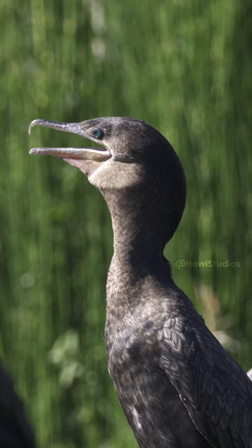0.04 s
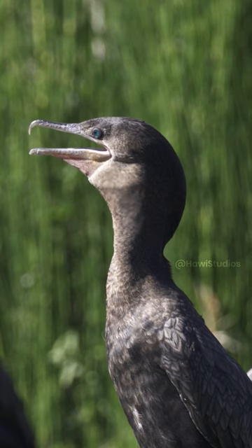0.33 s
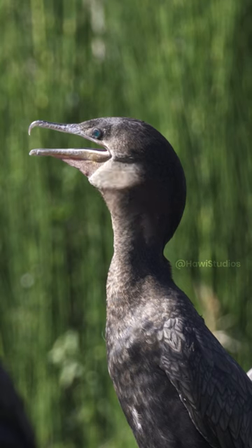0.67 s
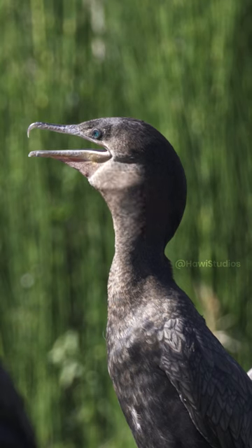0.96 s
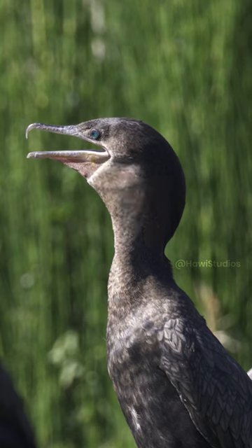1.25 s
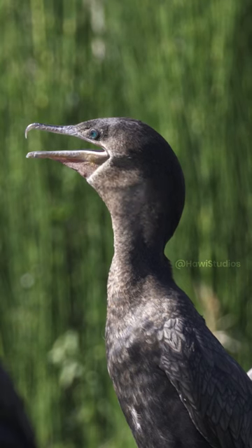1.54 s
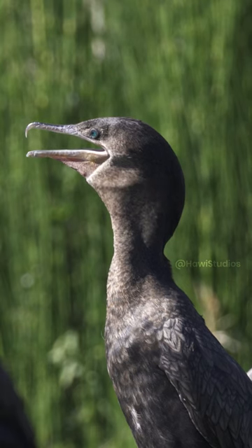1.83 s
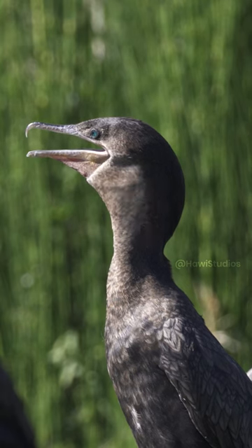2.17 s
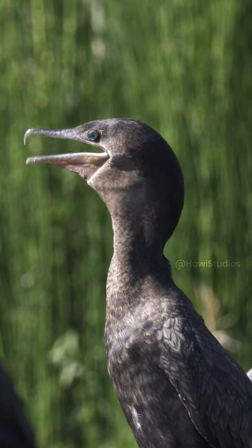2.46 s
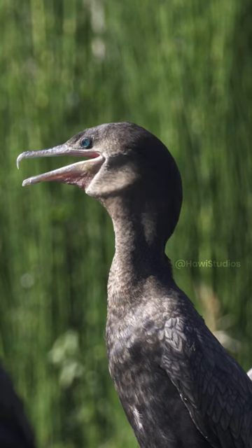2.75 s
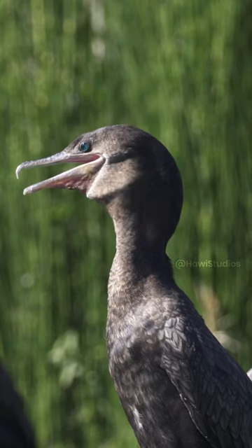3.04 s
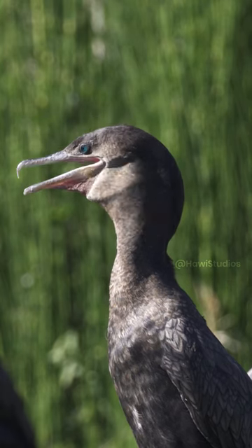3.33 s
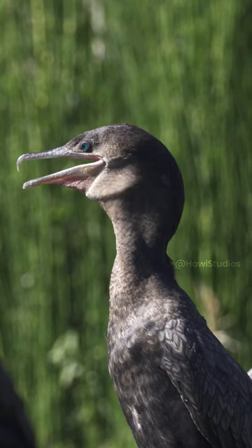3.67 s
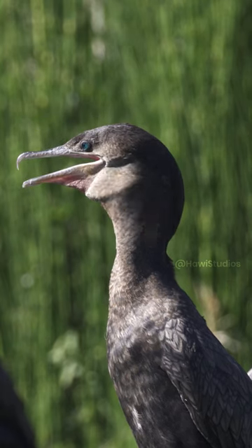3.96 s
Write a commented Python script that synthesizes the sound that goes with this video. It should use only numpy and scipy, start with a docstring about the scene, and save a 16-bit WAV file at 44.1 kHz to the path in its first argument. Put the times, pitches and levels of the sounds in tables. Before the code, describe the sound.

A cormorant rasps harshly close by on the left in rapid double strokes, which turn quicker and brighter, then uneven. Faint distant birds whistle and mew over a high twittering hiss and a low outdoor rumble.

```python
"""A cormorant rasps close by on the left, bill open: double rasps, ten a second, each led by a soft
scrape; then quicker, brighter doubles as the bill opens wider, and a limping run of single rasps.
Each rasp is a burst of tiny snaps and air that rings the throat. Behind it, far birds give falling
whistles and hoarse mews, and there is one soft, dull bump. The bed is a high, uneven, twittering
hiss over a low outdoor rumble."""
import sys
import numpy as np
from scipy import signal
from scipy.fft import rfft, irfft
from scipy.io import wavfile
from scipy.ndimage import uniform_filter1d

SR = 44100
rng = np.random.default_rng(int(sys.argv[2]) if len(sys.argv) > 2 else 0)


def int16_out(signal):
    """Quantize to a 16-bit WAV file."""
    q = np.round(np.clip(np.atleast_2d(signal).T, -1, 1) * 32767)
    wavfile.write(sys.argv[1], SR, q.astype(np.int16))


N = 176400

# Cue levels are ahead of the mix gains.
# double rasps: first stroke (t/s, level/dB, length/s), then the same for the second
DOUBLE_CUES = [(0.1514, -28, 0.0055, 0.1678, -29, 0.0065), (0.2545, -25, 0.0041, 0.268, -30, 0.0052),
               (0.3546, -34.5, 0.0085, 0.3696, -30, 0.0098), (0.4573, -31, 0.0053, 0.4721, -29, 0.0063),
               (0.5595, -27.3, 0.0036, 0.5758, -29.5, 0.0056), (0.6628, -31, 0.0047, 0.6784, -29, 0.0049),
               (0.7642, -30.5, 0.0035, 0.7767, -28, 0.0079), (0.8658, -27, 0.0024, 0.8838, -27.6, 0.0054),
               (0.9719, -29.5, 0.0052, 0.9864, -31, 0.0067), (1.0733, -31, 0.0044, 1.0884, -26.6, 0.006),
               (1.176, -31.5, 0.0054, 1.1926, -29.5, 0.0052), (1.282, -36, 0.011, 1.2955, -29, 0.0095),
               (1.386, -29, 0.0047, 1.4045, -31, 0.0093), (1.4941, -31.5, 0.0057, 1.5075, -26, 0.0067),
               (1.6081, -29.2, 0.0057, 1.6242, -29.0, 0.0044), (1.7099, -31.0, 0.0063, 1.7262, -31, 0.0082),
               (1.81, -31.5, 0.0057, 1.8249, -28, 0.0067), (1.9106, -29, 0.0071, 1.9277, -26.5, 0.0059),
               (2.0146, -29.5, 0.0078, 2.0301, -31, 0.0076), (2.1163, -27.5, 0.0047, 2.1311, -28, 0.0064),
               (2.2179, -29.5, 0.0057, 2.2337, -26.5, 0.0054), (2.3228, -30.5, 0.0052, 2.3368, -27, 0.0056),
               (2.4225, -33.5, 0.006, 2.4382, -26.5, 0.0063), (2.5255, -29, 0.0039, 2.5416, -24, 0.0064),
               (2.6308, -32, 0.0064, 2.6457, -28.5, 0.0081), (2.7452, -27, 0.0031, 2.7568, -35, 0.0055),
               (2.8163, -28.5, 0.0034, 2.828, -37.5, 0.0086),
               (2.8861, -28.5, 0.0054, 2.8983, -34.1, 0.0083), (2.9564, -26, 0.0047, 2.9681, -31.5, 0.0098),
               (3.0285, -25.5, 0.0042, 3.0374, -32, 0.0077), (3.098, -25.5, 0.0044, 3.1104, -33.5, 0.0078),
               (3.168, -27, 0.005, 3.1808, -36.4, 0.0096), (3.239, -28.5, 0.0057, 3.2548, -33.5, 0.0041)]
# single rasps (t/s, level/dB, length/s, least stereo width/dB)
SINGLE_CUES = [(3.3157, -34.5, 0.0067, -17), (3.3488, -31, 0.0095, -4), (3.4107, -34.3, 0.0076, -14),
               (3.4462, -31, 0.01, -13), (3.5053, -30, 0.0035, -15), (3.541, -30, 0.011, -18),
               (3.6, -32, 0.0051, -14), (3.6355, -33.0, 0.01, 0), (3.6952, -31.5, 0.0072, -10),
               (3.73, -31.0, 0.0073, -1.5), (3.79, -30, 0.0045, -12), (3.823, -29.5, 0.005, -2),
               (3.8846, -33.5, 0.0074, -8), (3.9197, -29.5, 0.01, -5), (3.9783, -33.5, 0.0059, -13)]
# soft scrapes leading into the slow doubles (t/s, level/dB)
SCRAPE_CUES = [(0.125, -39.5), (0.228, -39.5), (0.333, -38), (0.433, -38), (0.534, -36.5), (0.638, -36.5),
               (0.735, -37), (0.841, -38.1), (0.942, -39), (1.049, -38), (1.151, -38.5), (1.26, -43.5),
               (1.357, -39.5), (1.464, -40.0), (1.58, -36.5), (1.685, -34), (1.784, -34.5), (1.887, -36.5),
               (1.988, -34.5), (2.092, -39), (2.194, -37), (2.3, -35.5), (2.397, -40), (2.499, -35.5),
               (2.605, -36)]
# throat colour of a double's two strokes, a single and a scrape (f/Hz, level/dB)
FIRST_EQ = [(1000, -41), (2000, -31.5), (2500, -17.5), (3300, -1.5), (4400, -2.5), (5500, 1.5), (6200, -8),
            (7200, -16.5), (8000, -17), (9000, -11), (9700, -16), (10500, -31.5), (12000, -47.5)]
SECOND_EQ = [(1000, -38.5), (2000, -26.5), (2600, -16.5), (3300, -10.5), (4400, 0), (5500, 2.5),
             (6200, -4.5), (7200, -12.5), (8000, -16.5), (9000, -8.5), (9700, -14.5), (10500, -27),
             (12000, -57)]
SINGLE_EQ = [(1000, -36), (2000, -25.5), (2800, -19), (3300, -14.5), (4200, -1.5), (5300, 2), (6000, 0),
             (6650, -4.5), (7900, -13.5), (8800, -6), (9700, -15), (10700, -19.5), (12000, -52)]
SCRAPE_EQ = [(1200, -29.5), (2100, -12.5), (2500, -10.5), (3300, -1), (4100, -4), (5000, -11.5),
             (6300, -12), (7500, -42.5), (11000, -52)]
# brightening from a wide-open bill (f/Hz, level/dB)
GAPE_EQ = [(2000, 0), (3300, -10.5), (4200, -6.5), (5200, 1.5), (6500, 2.5), (9000, 3.5), (11000, 3.5)]
# narrow throat resonances in every rasp (f/Hz, width/Hz, lift/dB)
THROAT_RINGS = [(2113, 84, 10), (2673, 70, 8.5), (3093, 79, 7.5), (3350, 205, 7.5), (3660, 140, 5.5),
                (4126, 180, 6), (4490, 140, 2), (4784, 98, 2), (4970, 140, 5), (5500, 160, 4),
                (6610, 86, 10), (7130, 58, 12), (7483, 85, 10.5), (8780, 50, 5)]
# stereo width of a rasp, side against mid (f/Hz, level/dB)
SIDE_EQ = [(1000, -28), (3000, -12.5), (5500, -16.5), (6700, -13), (7300, -6), (8000, -3.5), (8900, -4.5),
           (10000, -2.5)]
# far call contours before transposing and stretching (t/s, f/Hz, level/dB, roughness/0-1)
WHISTLE_CONTOUR = [(0, 1598, -25, 0.15), (.028, 1930, 0.5, 0.2), (.06, 1960, 6, 0), (.09, 1924, 5, 0.19),
                   (.12, 1823, -4, 0.36), (.2, 1811, -5.5, .45), (.3, 1780, -7, 0.46), (.38, 1753, -13, 0)]
MEW_CONTOUR = [(0, 2277, -21, 0.13), (.028, 2284, -1, 0.15), (.05, 2093.5, 0.5, 0.2),
               (.075, 1834, -1, 0.22), (.1, 1701.5, 3, 0.37), (.13, 1652, 0, 0.95), (.17, 1671, -1, .9),
               (.205, 1660, -1, 1), (.222, 1540, -18, 1)]
# long whistles (t/s, level/dB)
WHISTLE_CUES = [(.905, -51), (3.578, -51.5)]
# falling mews (t/s, level/dB, pitch/ratio, length/ratio)
MEW_CUES = [(2.5, -46.5, 1.0, 1.0), (1.975, -58, 0.99, .65), (2.1, -60, 1.06, .5), (1.3, -62.5, 0.97, 0.58)]
# fader ride of the hiss (t/s, level/dB)
HISS_RIDE = [(0.1, -48.5), (0.25, -43), (0.35, -44.5), (0.37, -43), (0.59, -46.5), (0.72, -40.5),
             (0.83, -44.5), (0.87, -39), (0.89, -48), (0.97, -39), (1.07, -42), (1.25, -43.5),
             (1.45, -40.5), (1.56, -41.5), (1.69, -40.5), (1.81, -41.5), (1.91, -43.5), (1.95, -47),
             (2.05, -39.5), (2.11, -42.5), (2.14, -36), (2.22, -44.5), (2.32, -39), (2.34, -47),
             (2.42, -37.5), (2.52, -43), (2.55, -41), (2.65, -37.5), (2.74, -43), (2.77, -45), (3.19, -42),
             (3.33, -44.5), (3.4, -40), (3.5, -45), (3.62, -41), (3.81, -43), (3.93, -40.5), (3.99, -44)]
# colour of the bump, the hiss and the rumble (f/Hz, level/dB)
BUMP_EQ = [(30, -10), (85, 1), (170, -15), (350, -12), (600, -31), (2000, -19), (6000, -82)]
HISS_EQ = [(2500, -26.5), (3100, -21.5), (3800, 0), (4400, 0.5), (5000, 3), (5600, -5), (6300, -12),
           (7200, -15.5), (8200, -18.5), (12000, -33)]
RUMBLE_EQ = [(20, -18), (40, -29), (62, -0.5), (105, 1.5), (160, -6), (300, -9), (480, -13), (800, -10),
             (1100, -14.5), (1600, -8), (2500, -13.5), (7000, -21), (9500, -13), (11000, -15.5),
             (12000, -31.5)]
# stereo image of the bed: centred lows, wide highs (f/Hz, left-right correlation/0-1)
BED_CORRELATION = [(100, .999), (350, 1), (700, 0.98), (1800, 0.94), (4700, 0.93), (7500, 0.81),
                   (11000, 0.19)]


def rasp(when, db, length, eq, tail_db, tail_s, lean, width_db=-40, gape=False):
    """A burst of snaps and air rings the throat; lean > 0 gives a slow attack and a quick release."""
    size, snaps_per_s, snap_spread_db, air = 8192, 2200, 2.0, .6
    t, hz = (np.arange(size) - size // 4) / SR, np.fft.rfftfreq(size, 1 / SR)
    half_length = length / 2 * (1 - lean * np.sign(t))
    swell = np.exp(-.5 * abs(t / half_length) ** 2.4)  # a slightly squared bell
    tail = amp(tail_db) * np.exp(-abs(t) / tail_s) * (t > 0)
    snaps = rng.random((2, size)) < snaps_per_s / SR
    snaps = snaps * amp(snap_spread_db * rng.standard_normal((2, size)))
    drive = np.maximum(swell, tail) * (unit(snaps) + air * rng.standard_normal((2, size)))
    rings = [*THROAT_RINGS, (rng.uniform(3300, 5800), 220, 6)]  # one ring differs in every rasp
    rings_db = sum(lift * np.exp(-2 * ((hz - f) / width) ** 2) for f, width, lift in rings)
    throat_db = curve(eq, hz) + gape * curve(GAPE_EQ, hz) + rings_db
    mid, side = (unit(colour(channel, throat_db)) for channel in drive)
    side = irfft(rfft(side) * amp(np.maximum(curve(SIDE_EQ, hz), width_db)))
    gain = amp(db) * np.sqrt(length * SR / size)
    return when + t[0], gain * np.array([mid + side, mid - side])


def cormorant():
    """The near bird's scrapes, doubles and singles, panned left with a little outdoor scatter."""
    out = np.zeros((2, N))
    for when, db in SCRAPE_CUES:
        add(out, *rasp(when, db, .014, SCRAPE_EQ, tail_db=-18, tail_s=.006, lean=.088))
    for t1, db1, length1, t2, db2, length2 in DOUBLE_CUES:
        gape = t1 > 2.7  # the bill opens wider for the quick doubles
        add(out, *rasp(t1, db1, length1, FIRST_EQ, tail_db=-3, tail_s=.0047, lean=-.016, gape=gape))
        add(out, *rasp(t2, db2, length2, SECOND_EQ, tail_db=-4, tail_s=.011, lean=-.052, gape=gape))
    for when, db, length, width_db in SINGLE_CUES:
        add(out, *rasp(when, db, length, SINGLE_EQ, tail_db=-1.5, tail_s=.0067, lean=-.091,
                       width_db=width_db))
    return amp([[.6], [.1]]) * out + amp(-17.5) * scatter(out, t60=.14, predelay_s=.0046)


def far_call(contour, transpose, stretch=1):
    """A bird's gliding tone; where it is rough, it breaks into hoarse little downward slurs."""
    slurs_per_s, slur_depth, jitter_depth = 33, .08, .07  # depths are shares of the pitch
    t = np.arange(SR // 2) / SR
    times, *columns = np.transpose(contour)
    hz, db, rough = (np.interp(t, times * stretch, column) for column in columns)
    jitter = unit(uniform_filter1d(rng.standard_normal(len(t)), size=90))
    slurs = 1 - 2 * (slurs_per_s * t % 1)
    pitch = hz * transpose * (1 + rough * (slur_depth * slurs + jitter_depth * jitter))
    tone = np.sqrt(2) * np.sin(2 * np.pi * np.cumsum(pitch) / SR)
    fade = np.clip(np.minimum(t, times[-1] * stretch - t) / .005, 0, 1)
    return np.tile(fade * amp(db) * tone, (2, 1))


def far_birds():
    """Whistles and mews, blurred by distance."""
    whistles, mews = np.zeros((2, 2, N))
    for when, db in WHISTLE_CUES:
        add(whistles, when, amp(db) * far_call(WHISTLE_CONTOUR, transpose=.99))
    for when, db, transpose, stretch in MEW_CUES:
        add(mews, when, amp(db) * far_call(MEW_CONTOUR, transpose, stretch))
    wet = amp(-.5) * scatter(whistles, t60=.75, predelay_s=.0052)
    wet += amp(-3.5) * scatter(mews, t60=.15, predelay_s=.0069)
    return amp(-5.5) * whistles + amp(-3) * mews + .91 * wet + .19 * wet[::-1]


def bump():
    """One dull bump of low noise that swells and dies quickly."""
    size, peak_s = 8192, .012
    age, hz = np.arange(size) / SR / peak_s, np.fft.rfftfreq(size, 1 / SR)
    body = unit(colour(rng.standard_normal(size), curve(BUMP_EQ, hz)))
    thud = amp(-48) * body * age * np.exp(1 - age)
    out = np.zeros((2, N))
    add(out, when=2.268, sound=np.tile(thud, (2, 1)))
    return out


def twitter():
    """Brief, high peeps, each gliding up or down, sprinkled across the stereo field."""
    peeps_per_s, length_s, band_hz, max_glide = 45, .022, (3800, 5700), .06
    out, progress = np.zeros((2, N)), np.linspace(0, 1, round(length_s * SR))
    for place, pitch, glide, gain, pan in rng.random((round(peeps_per_s * N / SR), 5)):
        hz = np.interp(pitch, (0, 1), band_hz) * (1 + max_glide * (2 * glide - 1) * progress)
        peep = gain * np.sin(np.pi * progress) ** 2 * np.sin(2 * np.pi * np.cumsum(hz) / SR)
        balance = 1 + .5 * (pan - .5) * np.array([1, -1])
        add(out, place * N / SR, np.outer(balance, peep))
    return unit(out)


def hiss():
    """A grainy high hiss with peeps tucked in, swelling and dipping unevenly."""
    ride_db = np.interp(np.arange(N) / SR, *np.transpose(HISS_RIDE))
    grain = wash(HISS_EQ, patchy_db=2.2, flicker_db=1.1, size=256)
    return amp(ride_db - .5) * unit(grain + amp(-5) * twitter())


def rumble():
    """The low, steady outdoor floor."""
    return amp(-58) * wash(RUMBLE_EQ, patchy_db=2.0, flicker_db=.3, size=2048)


def wash(eq, patchy_db, flicker_db, size):
    """Coloured stereo noise with drifting patches and a quick flicker shared by all bands."""
    hop, hz = size // 4, np.fft.rfftfreq(size, 1 / SR)
    frames = N // hop + 5
    real, imag, other_real, other_imag, patches = rng.standard_normal((5, frames, len(hz)))
    patches = unit(uniform_filter1d(uniform_filter1d(patches, size=8, axis=0), size=5, axis=1))
    flicker = unit(uniform_filter1d(rng.standard_normal((frames, 1)), size=3, axis=0))
    shared = curve(BED_CORRELATION, hz)
    left = real + 1j * imag
    right = shared * left + np.sqrt(1 - shared ** 2) * (other_real + 1j * other_imag)
    spectra = np.array([left, right]) * amp(curve(eq, hz) + patchy_db * patches + flicker_db * flicker)
    _, noise = signal.istft(spectra.transpose(0, 2, 1), nperseg=size, noverlap=size - hop)
    return unit(noise[:, :N])


def scatter(x, t60, predelay_s):
    """Diffuse reflections from reeds and banks, different for each ear."""
    t = np.arange(SR) / SR
    tail = rng.standard_normal((2, SR)) * amp(-60 * t / t60) * np.clip(t / predelay_s - 1, 0, 1)
    return signal.fftconvolve(x, tail / np.linalg.norm(tail[0]), axes=1)[:, :N]


def colour(x, db):
    """Minimum-phase EQ with the given gain per bin."""
    log_gain = np.log(amp(np.r_[db, db[-2:0:-1]]))
    return irfft(rfft(x) * np.exp(signal.hilbert(log_gain).conj())[:len(db)])


def curve(points, hz):
    """Reads a table on a log-frequency axis."""
    f, value = np.transpose(points)
    return np.interp(np.log(hz + 1), np.log(f + 1), value)


def add(mix, when, sound):
    """Mixes in a stereo sound at a time in seconds."""
    part = mix[:, max(round(when * SR), 0):][:, :sound.shape[1]]
    part += sound[:, :part.shape[1]]


def amp(db):
    """Decibels to gain."""
    return 10 ** (np.asarray(db) / 20)


def unit(x):
    """Scales to rms 1."""
    return x / np.sqrt(np.mean(x ** 2) + 1e-20)


def scene():
    """The cormorant up front, with the bed, the far birds and the bump behind."""
    return cormorant() + hiss() + rumble() + far_birds() + bump()


def record(dry):
    """A moment of silence, a snap fade-in and a steep high cut."""
    start_s, fade_s, cutoff_hz = .069, .002, 12400
    fade_in = np.clip((np.arange(N) / SR - start_s) / fade_s, 0, 1)
    high_cut = signal.firwin(255, cutoff_hz, window=("kaiser", 9), fs=SR)
    return signal.oaconvolve(dry * fade_in, high_cut[None], "same")


dry = scene()
out = record(dry)
int16_out(out)
```